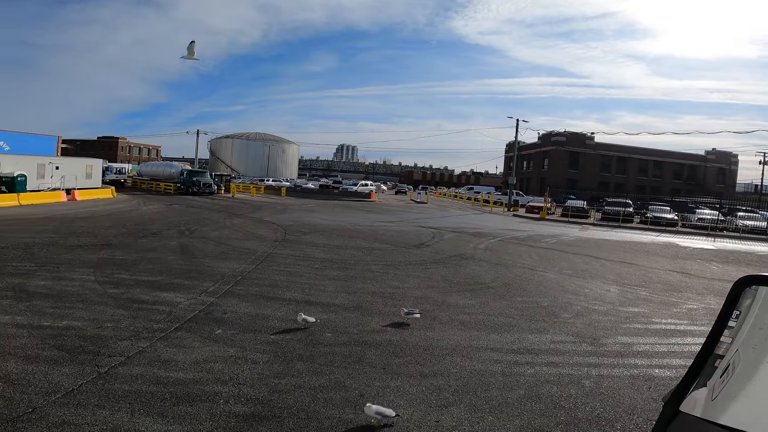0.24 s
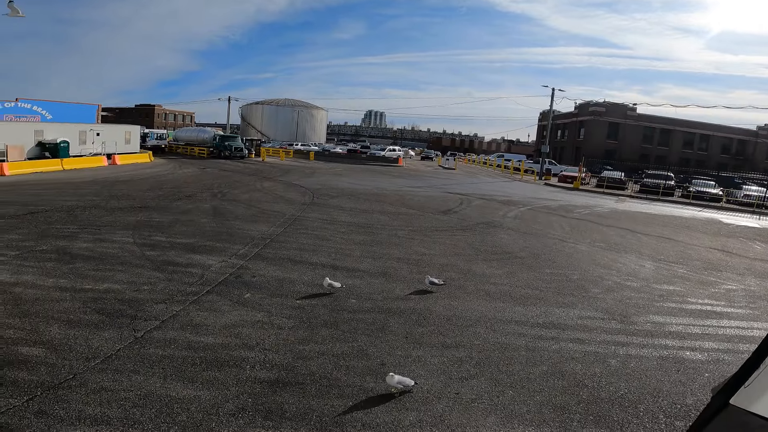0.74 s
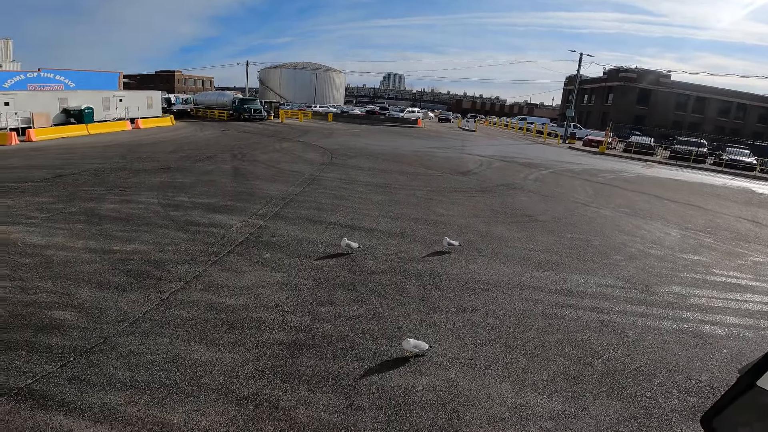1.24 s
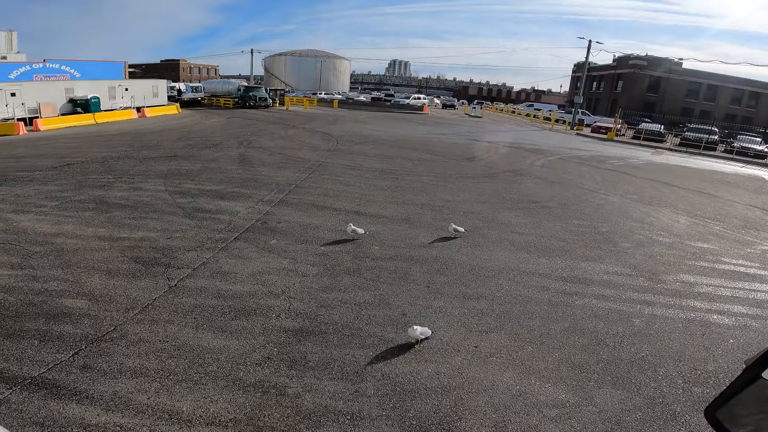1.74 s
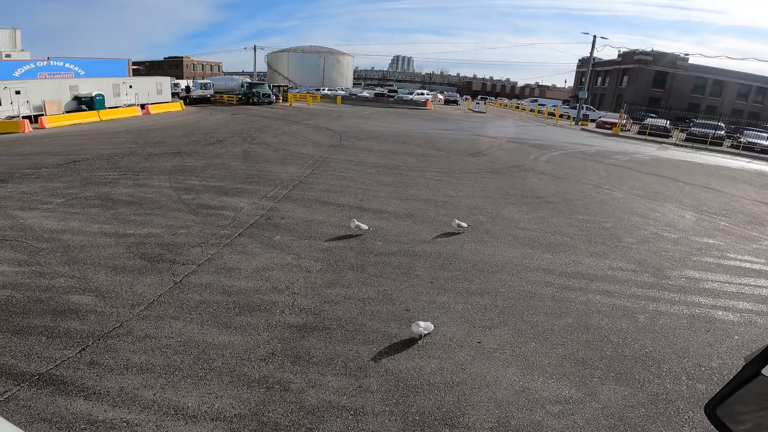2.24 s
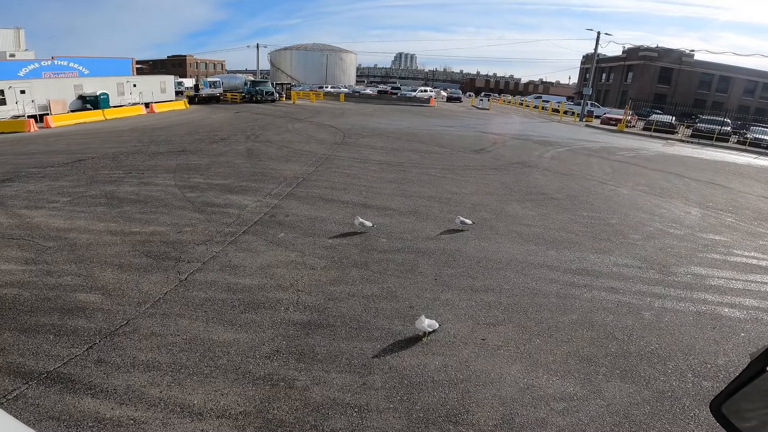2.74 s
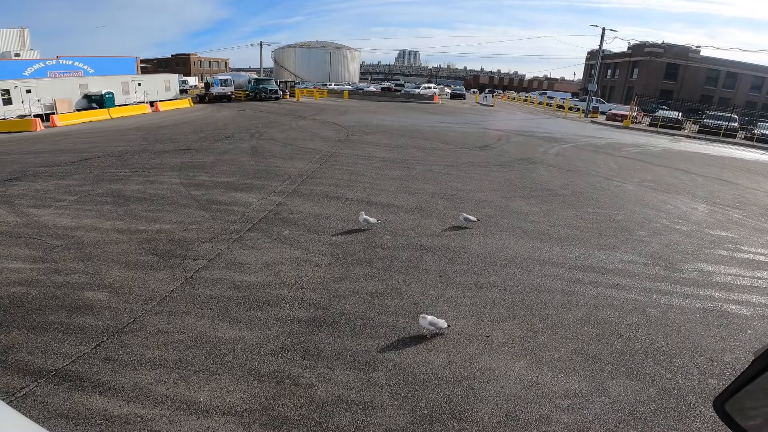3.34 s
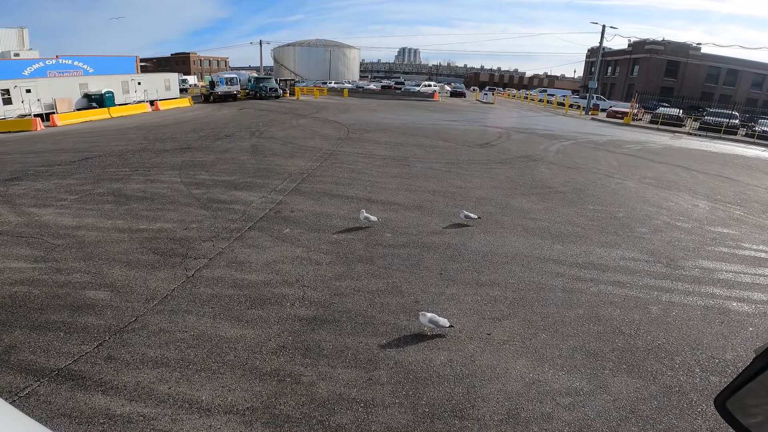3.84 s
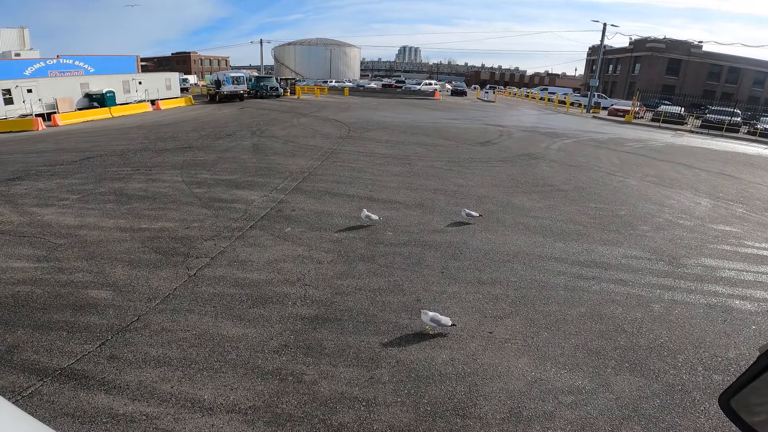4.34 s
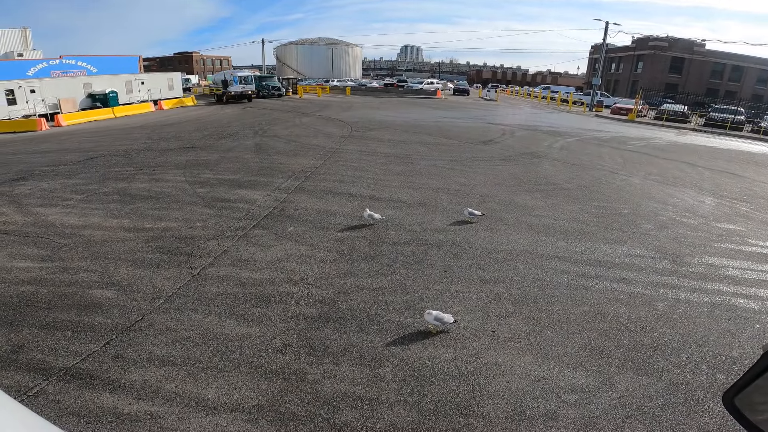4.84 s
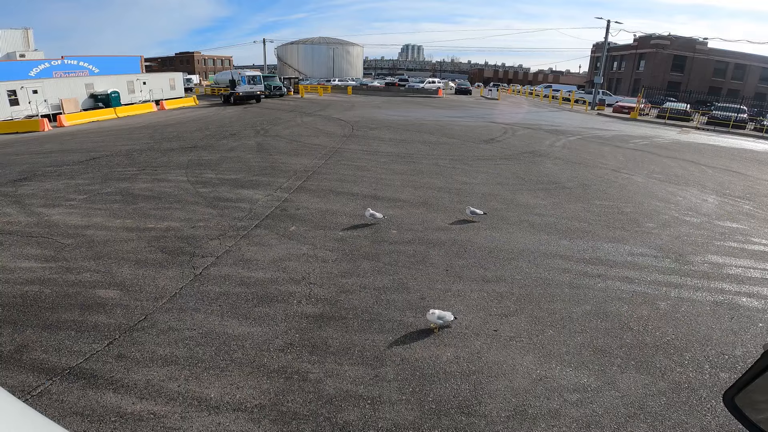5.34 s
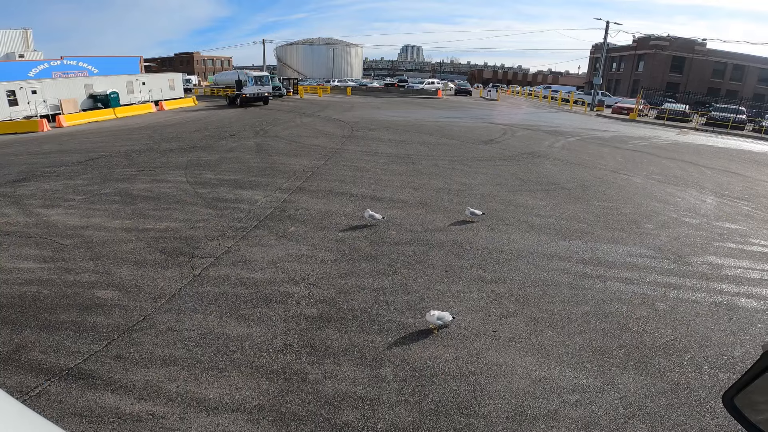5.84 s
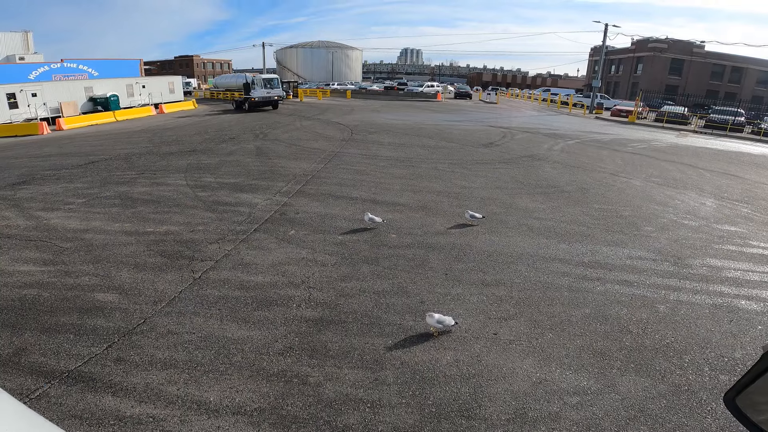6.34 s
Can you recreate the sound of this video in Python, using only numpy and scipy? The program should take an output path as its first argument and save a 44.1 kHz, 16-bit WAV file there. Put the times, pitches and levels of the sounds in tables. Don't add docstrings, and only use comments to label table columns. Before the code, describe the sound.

Heavy low engine rumble and airy fan noise run throughout, with quick rough clatter and small metallic chirps from a loose part. Over the start a gull yelps hoarsely, its voice breaking up into thin squeals; two more drawn-out squeals follow, then one faint distant peep. The camera microphone in the open yard begins narrow and muffled, gradually becoming brighter and wider, with the engine slightly left.

```python
import sys
import numpy as np
from scipy import signal
from scipy.fft import rfft, irfft, next_fast_len
from scipy.io import wavfile

SR = 44100
rng = np.random.default_rng(int(sys.argv[2]) if len(sys.argv) > 2 else 0)


def nominal_scale(level):
    x = np.asarray(level, float) / 20
    return 10 ** x


def generate_wav(sig):
    pcm = np.round(np.clip(np.atleast_2d(sig).T, -1, 1) * 32767).astype(np.int16)
    wavfile.write(sys.argv[1], SR, pcm)


N = 290431


def rms_one(x):
    return x / np.sqrt(np.mean(x ** 2) + 1e-20)


def in_time(rows):
    s, *columns = np.transpose(rows)
    return [np.interp(np.arange(N) / SR, s, c) for c in columns]


def at_hz(points, hz):
    points_hz, values = np.transpose(points)
    return np.interp(np.log(hz), np.log(points_hz), values)


def drift(rate):
    r = np.exp(-80 * np.pi * rate / SR)
    slow = signal.lfilter([1], [1, -2 * r, r * r], rng.standard_normal(N // 40 + 2002))[2000:]
    return np.interp(np.arange(N) / 40, np.arange(len(slow)), rms_one(slow - slow.mean()))


def resonance(x, hz, width):
    r = np.exp(-np.pi * width / SR)
    gain = (1 - r * r) / 2
    return signal.lfilter([gain, 0, -gain], [1, -2 * r * np.cos(2 * np.pi * hz / SR), r * r], x)


def steep_resonance(x, hz, width):
    return resonance(resonance(x, hz, width), hz, width)


def panned(x, db):
    return x * nominal_scale(np.array([db / 2, -db / 2]).reshape(2, -1))


def window(start, end, edge):
    at = np.arange(int((start - edge) * SR), int((end + edge) * SR))
    t = at / SR
    return at, np.clip(np.minimum(t - start + edge, end + edge - t) / (2 * edge), 0, 1)


# frequency in Hz, likeness from 0 to 1.
LIKENESS = [(30, 1), (60, 0.99), (200, 0.99), (330, 0.98), (500, 0.85), (1150, 0.88), (2700, 0.77),
            (6500, 0.52), (10400, 0.44), (11600, 0.75)]
# frequency in Hz, left-right difference in dB.
LEAN = [(200, 0.2), (400, 1.5), (700, 3), (2000, 2.5), (5000, 4), (9000, 4), (12000, 3)]


def placed(mid, side, hz):
    alike = np.clip(at_hz(LIKENESS, hz), 0, 1)
    spread = np.sqrt((1 - alike) / 2) * side * [[1], [-1]]
    return panned(np.sqrt((1 + alike) / 2) * mid + spread, at_hz(LEAN, hz))


# time in seconds, treble in dB.
BRIGHTNESS = [(0, -3), (1.2, -3.5), (2, -1.5), (2.9, 0.4), (3.4, .5), (4, 1.5), (4.9, 1), (5.6, 4),
              (6.4, 1.5), (6.59, 4)]
# centre in seconds, half length in seconds, strength in dB.
SURGES = [
    (.35, 0.34, -2.5),
    (1.04, .25, 6),
    (3.287, 0.26, 0),
    (3.583, 0.067, -6),
    (4.8, 0.39, 2),
    (6.59, 0.11, 9.5),
]


def engine_swings():
    t, (treble_db,) = np.arange(N) / SR, in_time(BRIGHTNESS)
    rumble_db = sum(db * np.exp(-((t - s) / half) ** 2) for s, half, db in SURGES)
    boom_db = 3.5 * np.exp(-(t / 1.1) ** 4) + 0.14 * drift(1.6)
    middle_db = -0.026 * treble_db
    return rumble_db, boom_db, middle_db, treble_db


# frequency in Hz, level in dB per Hz.
ROAR = [(21, -6.5), (65, -3.5), (150, -2.5), (320, -10.5), (460, -12), (820, -17), (1200, -18), (2700, -30),
        (4300, -36), (7200, -41.5), (8400, -46.5), (10300, -57), (12500, -56.5), (13300, -83)]


def roar(levels_db):
    swing = [db - db.mean() for db in levels_db]
    size = next_fast_len(N)
    colour = nominal_scale(at_hz(ROAR, np.maximum(np.arange(size // 2 + 1) * SR / size, 1)))
    noise = irfft(rfft(rng.standard_normal((2, 2, size))) * colour, size)[..., :N]
    out, edges = 0, 16 * 2 ** np.arange(0, 10.1, .4)
    for k, (low, high) in enumerate(zip(edges, edges[1:])):
        hz = np.sqrt(low * high)
        band_pass = signal.butter(2, [low, high], "band", fs=SR, output="sos")
        band = signal.sosfilt(band_pass, noise[k % 2])
        slow_db = 0
        for (a, b, c, d), db in zip(np.eye(4), swing):
            reach = list(zip([70, 150, 245, 500, 1500, 7000], [0, a, b, c, c, d]))
            slow_db = slow_db + at_hz(reach, hz) * db
        gust_db = at_hz([(100, 1.2), (400, .8), (3000, .5)], hz) * drift(4)
        out = out + nominal_scale(slow_db + gust_db) * placed(*band, hz)
    return nominal_scale(-25.5) * rms_one(out)


# time in seconds, level in dB.
WHINE = [(0, -65), (.2, -69), (.4, -71), (.86, -77), (1.02, -63), (1.5, -57.5), (2.38, -55.5), (2.73, -63),
         (2.8, -55), (3.15, -57), (3.26, -54.5), (3.74, -51.5), (4, -57), (5.12, -54.5), (5.48, -64),
         (5.72, -58), (6.25, -59.5), (6.59, -55)]


def whine():
    turns = np.cumsum(6434 + 3.25 * drift(5.5)) / SR
    tone = np.sin(2 * np.pi * turns) + nominal_scale(-42) * np.sin(4 * np.pi * turns)
    return panned(np.sqrt(2) * nominal_scale(in_time(WHINE)[0] + drift(15)) * tone, 4.5)


NEAR_CYCLE_HZ, FAR_CYCLE_HZ = 5.4157, 6.1725
# multiple of the engine cycle, level in dB rms.
NEAR_ORDERS = [(6, -35.5), (12, -31.5), (13, -47.8), (15, -40.8), (16, -44.9), (18, -45.2), (19, -48.5),
               (21, -47.6), (22, -47.1), (30, -43.3), (32, -51.6), (33, -50.6), (39, -43.5), (41, -53.4),
               (42, -47.9), (43, -49.8), (46, -50.9), (48, -55.1), (51, -48.9), (58, -52.3), (60, -53.7),
               (62, -52.1), (66, -55.0), (78, -55.6), (84, -57.0), (90, -58.5), (96, -52.0), (99, -54.3),
               (108, -51.8)]
# multiple of the engine cycle, level in dB rms.
FAR_ORDERS = [(4, -40.3), (8, -32.6), (9, -42.1), (12, -49.3), (16, -42.8), (22, -47.1), (36, -54.2),
              (93, -60.1)]
# frequency in Hz, level in dB rms.
HUMS = [(55.7, -39), (117.78, -39)]


def exhausts():
    t, out = np.arange(N) / SR, 0
    near = [(k * NEAR_CYCLE_HZ, db) for k, db in NEAR_ORDERS]
    far = [(k * FAR_CYCLE_HZ, db) for k, db in FAR_ORDERS]
    for hz, db in near + far + list(HUMS):
        out = out + np.sqrt(2) * nominal_scale(db) * np.sin(2 * np.pi * (hz * t + rng.random()))
    return out


# resonance in Hz, width in Hz, level in dB rms.
PANELS = [(151.7, 7.6, -37), (241.9, 13, -48), (326.3, 14.2, -38.5), (528.4, 14.2, -42.5),
          (579.6, 9.9, -45.5), (910.2, 7.2, -47), (981, 41, -47), (1146, 11, -51), (1412, 26, -51)]


def panels(rumble_db, boom_db):
    low_pass = signal.butter(4, 2500, fs=SR, output="sos")
    white = signal.sosfilt(low_pass, rng.standard_normal((2, N)))
    out = 0
    for hz, width, db in PANELS:
        ring = rms_one(resonance(resonance(white, hz, 3 * width), hz, width))
        surge_db = 3.96 * boom_db * (200 < hz < 300) + .8 * rumble_db * (hz < 200)
        out = out + nominal_scale(db + drift(5.2) + surge_db) * placed(*ring, hz)
    return out


CYLINDERS_DB = [4, 0, 0, 0.5, -11, -10]
# resonance in Hz, width in Hz, level in dB rms.
CLATTER = [(3613, 420, -50.5), (4960, 1700, -55.5), (1676, 190, -51.5)]


def clatter():
    first_s = 0.1708 - 1 / NEAR_CYCLE_HZ
    times = np.arange(first_s, N / SR, 1 / NEAR_CYCLE_HZ / 6)
    strength_db = np.resize(CYLINDERS_DB, len(times)) + 0.71 * rng.standard_normal(len(times))
    blows = np.zeros(N)
    blows[(times[times > 0] * SR).astype(int)] = nominal_scale(strength_db[times > 0])
    r = np.exp(-1 / (0.013 * SR))
    bursts = signal.lfilter([1], [1, -2 * r, r * r], blows)
    steady = .6 * bursts.mean()
    white = rng.standard_normal((2, N)) * (bursts + steady) * nominal_scale(0.96 * drift(6.9))
    return sum(nominal_scale(db) * placed(*rms_one(steep_resonance(white, hz, width)), hz)
               for hz, width, db in CLATTER)


# time in seconds, peak in dB, pitch in Hz.
KNOCKS = [(0.9507, -39, 3680), (0.9887, -36, 3700), (1.046, -38, 3550), (1.1358, -36, 3550),
          (1.1957, -37, 3540), (1.8746, -35, 3540), (1.9475, -40, 3580), (2.0173, -41, 3670),
          (2.0592, -37, 3550), (2.2433, -33, 3510), (2.4284, -33, 3660), (2.5711, -34, 3460),
          (2.6329, -35, 3580), (3.1348, -44, 3470), (3.1667, -35, 3570), (3.2036, -39, 3660),
          (3.5314, -37, 3490), (3.5917, -41, 3640), (3.677, -36, 3400), (3.9424, -36, 3570),
          (4.126, -40, 3580), (4.2757, -45, 3520), (4.4633, -44, 3640), (4.5456, -41, 3600),
          (4.7052, -38, 3570), (4.8888, -35, 3570), (5.0754, -35, 3570), (5.2001, -38, 3620),
          (5.236, -35, 3620), (5.2694, -34, 3460), (5.3852, -35, 3660), (5.4191, -37, 3580),
          (5.4594, -40, 3580), (5.5623, -48, 3510), (5.6271, -30, 3560), (5.7124, -38, 3410),
          (5.7493, -31, 3660), (5.7857, -33, 3730), (5.8985, -37, 3530), (5.9464, -36, 3470),
          (5.9993, -32, 3580), (6.1255, -38, 3620), (6.1594, -39, 3590), (6.2094, -44, 3490),
          (6.3111, -42, 3590), (6.3594, -39, 3590), (6.4991, -40, 3480), (6.5535, -45, 3800)]


def knocks():
    out, t = np.zeros(N + SR), np.arange(SR // 10) / SR
    rise_s, trim_db = .005, -5.5
    for s, db, hz in KNOCKS:
        at = int((s - rise_s / 2) * SR)
        swell = t / rise_s * np.exp(1 - t / rise_s)
        out[at:at + len(t)] += nominal_scale(db + trim_db) * swell * np.sin(2 * np.pi * hz * t)
    return panned(out[:N], 4.9)


# start and end in seconds, first and last pitch in Hz, level in dB, voice.
NOTES = [(0.073, 0.12, 857, 790, -22.5, "hoarse"), (0.122, .139, 772, 744, -29, "cracked"),
         (0.141, 0.176, 748, 769, -26, "rising"), (0.176, 0.205, 715, 745, -27.5, "pinched"),
         (0.271, 0.297, 838, 851, -31.5, "closing"), (0.298, 0.321, 790, 777, -29.5, "nasal"),
         (0.318, 0.337, 576, 562, -33, "dying"), (0.335, 0.355, 2060, 1960, -30.5, "gulp"),
         (0.599, 0.649, 888, 815, -22.5, "open"), (0.648, 0.666, 780, 725, -27.5, "cracked"),
         (0.664, 0.704, 745, 800, -27.5, "climbing"), (0.703, 0.729, 706, 726, -24.5, "pinched"),
         (0.797, 0.85, 830, 870, -32, "shutting"), (0.853, 0.875, 787, 722, -33, "nasal"),
         (0.867, 0.892, 568, 555, -41, "dying"), (1.336, 1.374, 791, 795, -27.5, "catching"),
         (1.373, 1.401, 1705, 1684, -24, "honk"), (1.407, 1.411, 1740, 1700, -30, "honk"),
         (2.692, 2.719, 2940, 3040, -38, "lead-in"), (2.95, 3.034, 3240, 3030, -33.5, "lead-out"),
         (3.453, 3.521, 4200, 3680, -49, "far")]
# voice, then rows of time in seconds, pitch in Hz, level in dB.
SQUEALS = [
    ("reedy", [(.203, 3010, -29), (.222, 3070, -30), (.232, 3210, -29.5), (.244, 3200, -40), (.262, 3285, -26), (.286, 3400, -39), (.293, 3370, -44)]),
    ("thin", [(.728, 3040, -30), (.749, 3132, -27.5), (.767, 3210, -35), (.785, 3290, -25.5), (.805, 3300, -34)]),
    ("swelling", [(1.408, 2960, -57), (1.42, 3020, -33), (1.447, 3100, -27), (1.474, 3160, -31.5), (1.501, 3360, -28), (1.528, 3460, -37), (1.56, 3590, -29.5), (1.61, 3670, -32), (1.64, 3420, -45)]),
    ("full", [(2.722, 3240, -23), (2.76, 3250, -27.5), (2.812, 3400, -28.5), (2.83, 3560, -37), (2.865, 3680, -31), (2.9, 3800, -33), (2.93, 3879, -33), (2.946, 3910, -40), (2.956, 3300, -40)]),
]
SHAPES = {"climbing": (1.05, 2.3, -2.5), "shutting": (.5, -2.5, 1.5), "gulp": (1, -2.5, -10),
          "hoarse": (0.64, -5.5, -4), "open": (0.53, -4, -4.5), "cracked": (0.48, 0.5, 1.5),
          "rising": (0.87, 2.1, -3), "pinched": (1.4, -2.5, -5), "closing": (.6, -.5, 2.5),
          "nasal": (0.55, 1.5, -4), "dying": (1, 3.5, -1.3), "catching": (1.05, -14, -6),
          "honk": (2.6, -5, -2.5), "lead-in": (4.8, 1, 13), "lead-out": (0.74, .5, -11),
          "far": (1.1, 0, 1.5)}
PEAK_AT = {"open": .25, "hoarse": .25, "lead-out": .25, "honk": .25, "gulp": .25}


def sung():
    along, out = np.linspace(0, 1, num=5), list(SQUEALS)
    for start, end, first_hz, last_hz, db, voice in NOTES:
        bend, start_db, end_db = SHAPES[voice]
        hz = first_hz + (last_hz - first_hz) * along ** bend
        swell_db = np.interp(along, [0, PEAK_AT.get(voice, .5), 1], [start_db, 0, end_db])
        out.append((voice, np.transpose([start + (end - start) * along, hz, db + swell_db])))
    return out


ROUGHNESS = {"hoarse": .25, "reedy": .07, "open": .15, "cracked": .8, "rising": .3, "pinched": .2,
             "closing": .15, "nasal": .1, "dying": .4, "gulp": .3, "climbing": .35, "shutting": .12,
             "catching": .25, "swelling": .03, "honk": .08, "lead-in": .1, "lead-out": .05, "far": .05,
             "thin": .05, "full": .03}
LOW_COLOURS = {"open": [[-14, -5, -1, -6.5, -4.5, -15, -33], [-10, -2, -0.5, -11, -9, -12, -40]], "hoarse":
               [[-8, -5.5, -2.2, -14, -17, -11.5, -26], [-16, -26, 0.13, -8, -29, -20, -39]], "cracked":
               [[-17, -3, -1, -6, -16, -20, -21]], "rising": [[-53, -3, 1, -7, -24, -25, -15], [-50, 2, -4,
               -10, -24, -20, -14.5], [-35, -3, -16, -4, -26, -14, -33]], "pinched": [[-57, -21, 0, -11,
               -22, -24, -19]], "closing": [[-28, -22, -3, -5, -18, -14, -24], [-28, -20, -.5, -12, -28,
               -18, -30]], "nasal": [[-55, -55, 3, -22, -55, -7.5, -31, -50, -22.5], [-55, -40, -12, -31,
               -40, -6.5, -19, -50, -26]], "dying": [[-40, -30, -1.5, -7, -16, -22, -17, -12]], "gulp":
               [[-.5, -25]], "climbing": [[-50, -4, 2, -22, -14, -12, -22], [-50, -1.5, -11, -13, -14, -12,
               -34], [-35, 2, -24, -5.5, -24, -11, -34]], "shutting": [[-30, -25, 2, -1, -13, -18, -21],
               [-30, -25, -2, -1, -14, -28, -29], [-30, -25, 2, -12, -30, -30, -31]], "catching": [[-55, 2,
               -9, -20, -26, -28, -33], [-30, -5, -1, -5, -15, -17, -33], [-16, -20, -3, -23, -28, -30,
               -40]], "honk": [[1, 0, -22, -38, -36, -42], [-1.5, -1, -11, -38, -38, -44], [1, -3, -11, -38,
               -42, -48]]}
HIGH_COLOURS = {"thin": [[0, -45, -35, -40]], "reedy": [[0, -24, -46, -37]], "full": [[0, -13.5, -27.5,
                -42], [0, -9, -31, -41], [0, -21, -36, -42], [0, -33, -48, -55]], "swelling": [[0, -28, -35,
                -48], [0, -14, -30, -40], [0, -11, -39, -35], [0, -30, -35, -46], [0, -36, -40, -59]],
                "lead-in": [[0, -32]], "lead-out": [[0, -21]], "far": [[0]]}
ONSET_HALVING = {"hoarse": 0.72, "open": 0.19, "honk": 0.22, "catching": .3}


def gull_note(voice, note, wobble, jitter, flutter, rasp):
    rough, colours = ROUGHNESS[voice], {**LOW_COLOURS, **HIGH_COLOURS}[voice]
    s, hz, db = np.transpose(note)
    low, squeal = hz[0] < 2500, hz[0] > 2500
    at, gate = window(s[0], s[-1], edge=.0045)
    t = at / SR
    shake = .0035 * wobble[at] + rough * .03 * jitter[at]
    turns = np.cumsum(np.interp(t, s, hz) * (1 + shake)) / SR
    middles = s[0] + (np.arange(len(colours)) + .5) / len(colours) * (s[-1] - s[0])
    late_db = 12 * np.exp(-np.maximum(t - s[0], 0) / 0.0079)
    stack = 0
    for k, glide_db in enumerate(np.transpose(colours)):
        own_db = (1 + 5 * rough) * flutter[at + 900 * k] + squeal * (.5 * k * k - late_db * (k > 0))
        level = nominal_scale(np.interp(t, middles, glide_db) + own_db)
        stack = stack + level * np.sin(2 * np.pi * ((k + 1) * turns + rng.random()))
    halving = .7 * rough * low + ONSET_HALVING.get(voice, 0) * np.exp((s[0] - t) / 0.0061)
    stack = stack * (1 + halving * (1 + .6 * flutter[at]) * np.sin(np.pi * turns))
    stack = stack * (1 + .6 * rough * jitter[at + 2000])
    breath = .5 * np.sqrt(rough) * low * rasp[at]
    return at, gate * nominal_scale(np.interp(t, s, db)) * (np.sqrt(2) * stack + breath)


# frequency in Hz, width in Hz, level in dB.
THROAT = [(1640, 370, -3), (2190, 670, 4), (3300, 540, -6.5), (4560, 760, -12)]
# start and end in seconds, level in dB.
BREAKS = [(0.063, .076, -39), (0.103, 0.128, -50), (0.187, 0.19, -35), (0.297, 0.378, -48),
          (0.58, 0.597, -37), (0.653, 0.675, -43), (0.702, 0.735, -44), (0.877, 0.915, -44),
          (1.335, 1.35, -54), (1.362, 1.375, -44), (1.406, 1.42, -49), (2.946, 2.96, -49)]
# start and end in seconds, level in dB.
WHEEZES = [
    (.07, .11, -68),
    (0.125, .17, -62),
    (.22, .3, -70),
    (.6, .64, -64),
    (.64, 0.704, -59),
    (1.35, 1.41, -70),
]
# delay in seconds, level in dB.
YARD_ECHOES = [(.011, -20), (.023, -21), (.041, -27), (.067, -29)]


def gull():
    out = np.zeros(N)
    wobble, jitter, flutter = drift(76), drift(260), drift(34)
    white = rng.standard_normal(N)
    rasp = rms_one(sum(nominal_scale(db) * rms_one(steep_resonance(white, hz, width)) for hz, width, db in THROAT))
    for voice, note in sung():
        at, sound = gull_note(voice, note, wobble, jitter, flutter, rasp)
        out[at] += sound
    for start, end, db in BREAKS:
        at, gate = window(start, end, edge=0.0035)
        out[at] += nominal_scale(db) * gate * rasp[at]
    air = rms_one(steep_resonance(white, 10700, 3100))
    for start, end, db in WHEEZES:
        at, gate = window(start, end, edge=.008)
        out[at] += nominal_scale(db + 2 * wobble[at]) * gate * air[at]
    out = out + sum(nominal_scale(db) * np.roll(out, int(s * SR)) for s, db in YARD_ECHOES)
    return np.array([out, np.roll(out, 1)])


def scene():
    levels_db = engine_swings()
    rumble_db, boom_db, _, treble_db = levels_db
    rattle = nominal_scale(treble_db - treble_db.mean()) * clatter() + panels(rumble_db, boom_db)
    return roar(levels_db) + whine() + exhausts() + rattle + knocks() + gull()


def band_limit(x):
    return signal.sosfilt(signal.butter(12, 15030, fs=SR, output="sos"), x)


# time in seconds, width in dB.
WIDTH = [(0, -17), (.3, -11), (.7, -18), (1.25, -15), (1.5, -10), (2, -7), (3, -4), (4.5, -1.5), (6.59, -1)]
# frequency in Hz, width in Hz, level in dB rms.
PORT_RING = (12300, 1200, -74.5)


def record(dry):
    hz, width, db = PORT_RING
    hiss = rms_one(steep_resonance(rng.standard_normal((2, N)), hz, width))
    left, right = dry + nominal_scale(db + .5 * in_time(BRIGHTNESS)[0]) * hiss
    mid, side = (left + right) / 2, (left - right) / 2
    treble_band = signal.butter(8, [9500, 11300], "band", fs=SR, output="sos")
    analytic = signal.hilbert(signal.sosfilt(treble_band, mid), next_fast_len(N))[:N]
    carrier = np.exp(2j * np.pi * 24000 * np.arange(N) / SR)
    mid = mid + nominal_scale(-21) * np.real(np.conj(analytic) * carrier)
    side_low = signal.sosfiltfilt(signal.butter(8, 11200, fs=SR, output="sos"), side)
    side = side - (1 - nominal_scale(in_time(WIDTH)[0])) * side_low
    top = signal.cheby2(10, 40, 15900, fs=SR, output="sos")
    fade_out = np.minimum((N - np.arange(N)) / 200, 1)
    return band_limit(signal.sosfilt(top, [mid + side, mid - side]) * fade_out)


dry = scene()
out = record(dry)
generate_wav(out)
```